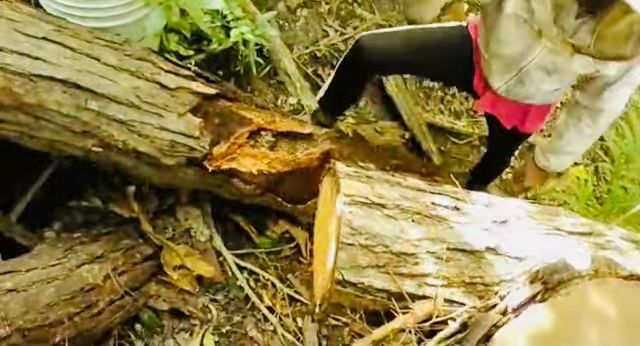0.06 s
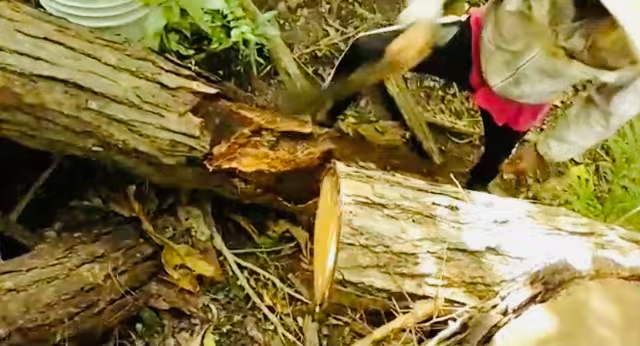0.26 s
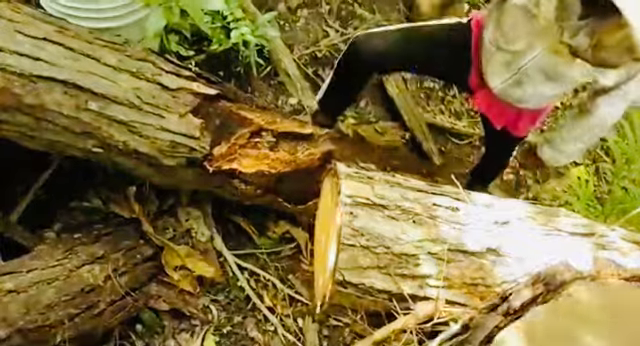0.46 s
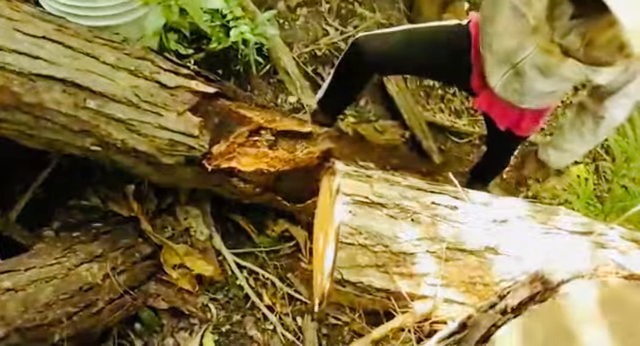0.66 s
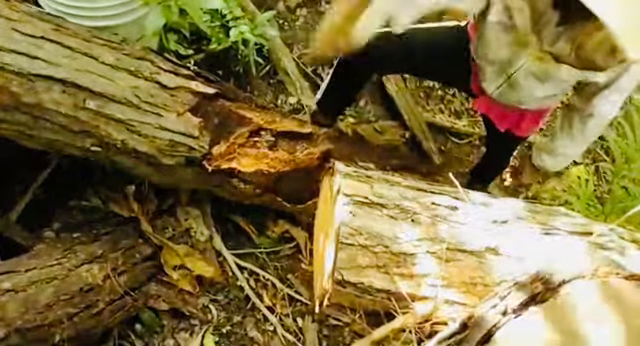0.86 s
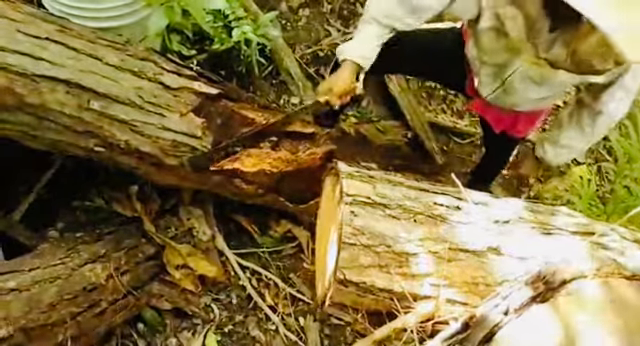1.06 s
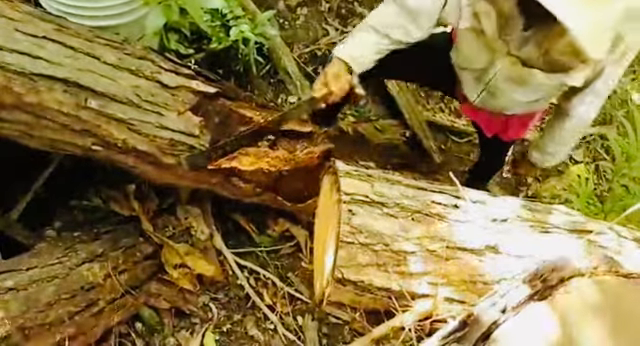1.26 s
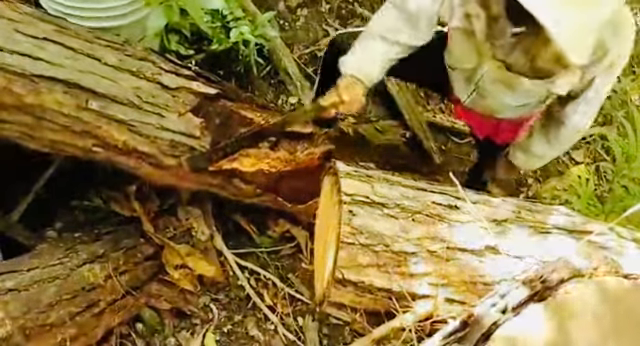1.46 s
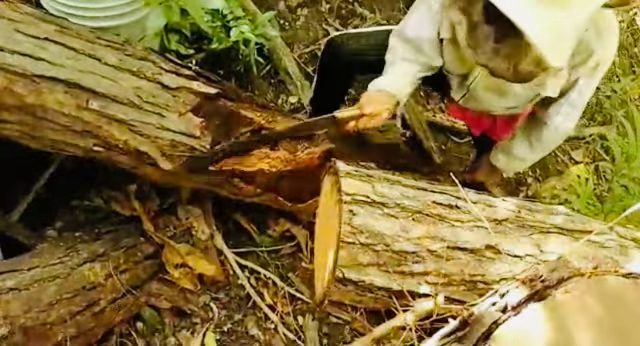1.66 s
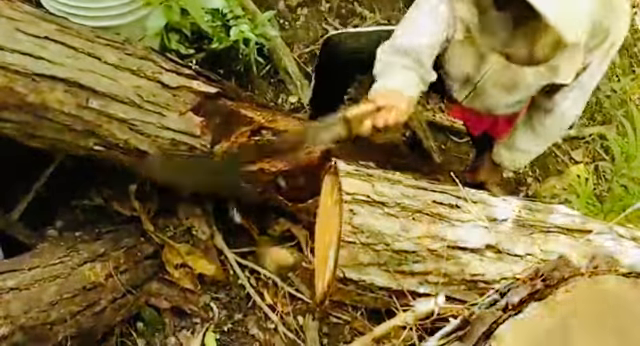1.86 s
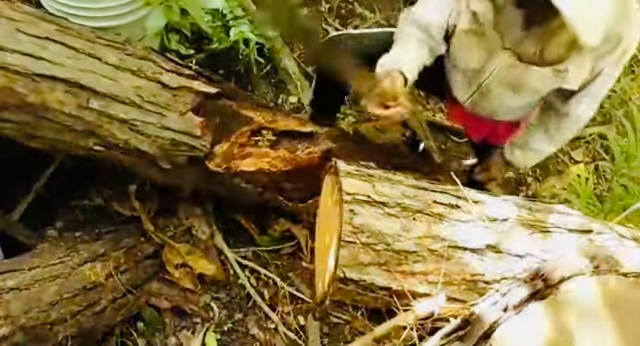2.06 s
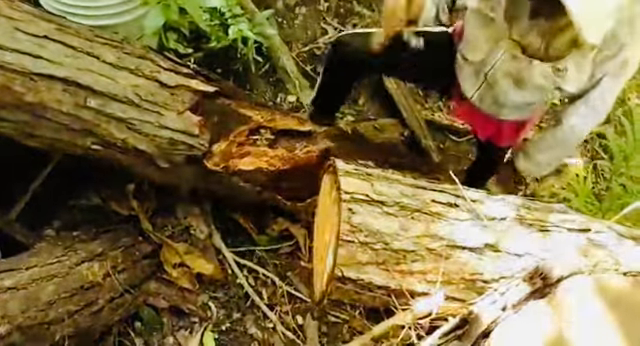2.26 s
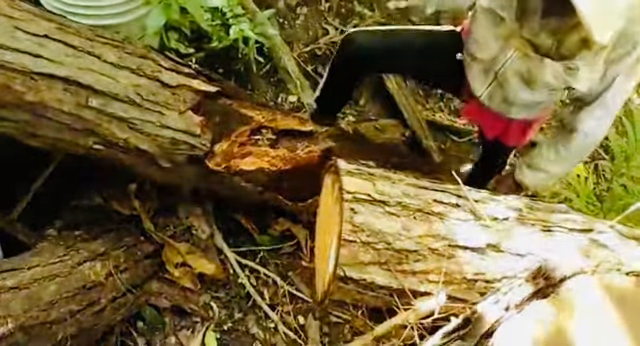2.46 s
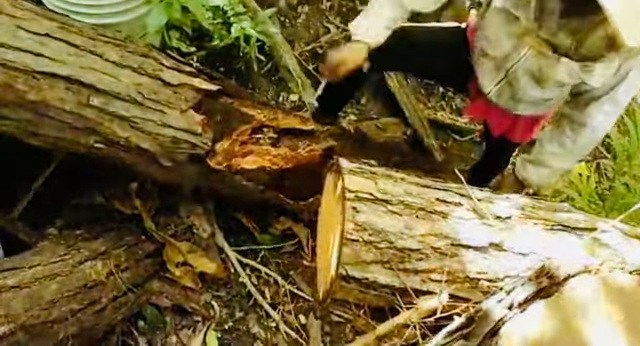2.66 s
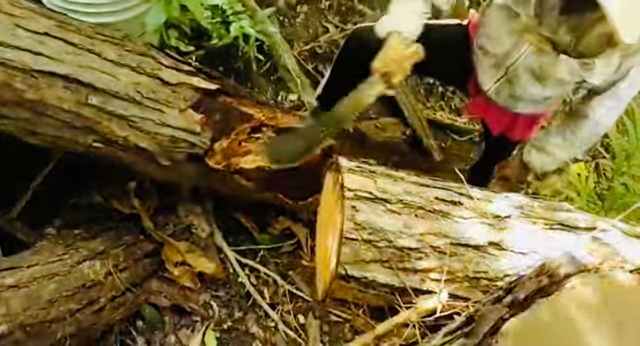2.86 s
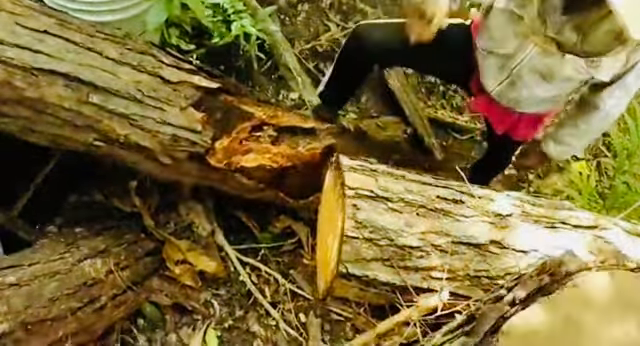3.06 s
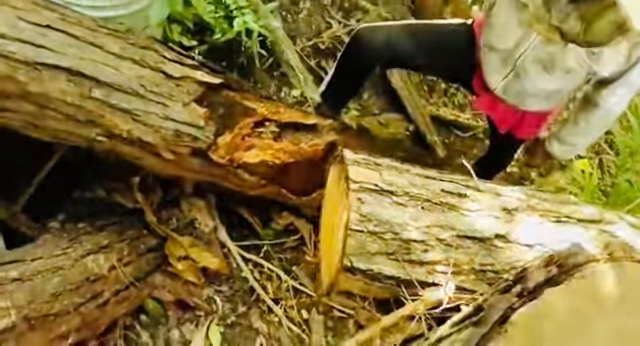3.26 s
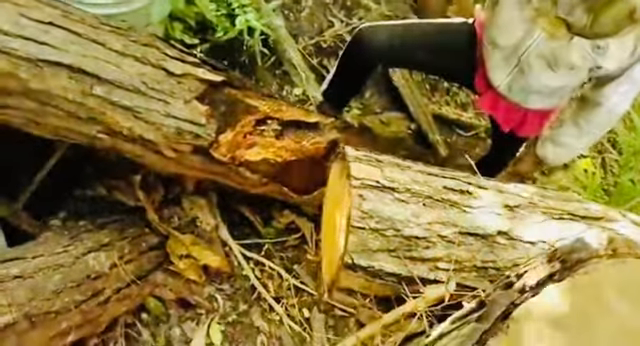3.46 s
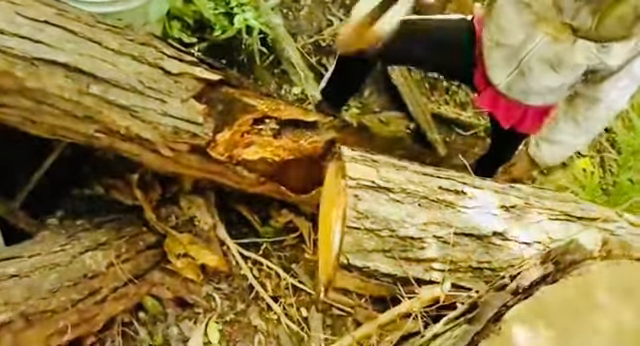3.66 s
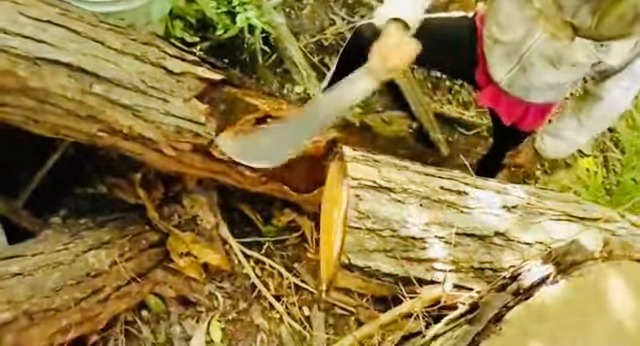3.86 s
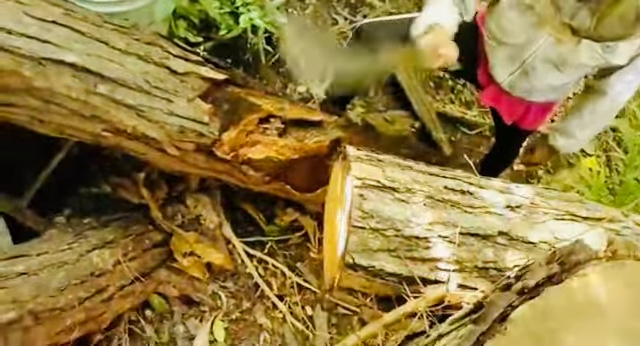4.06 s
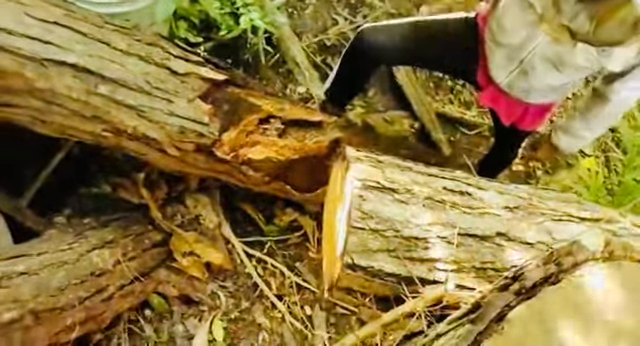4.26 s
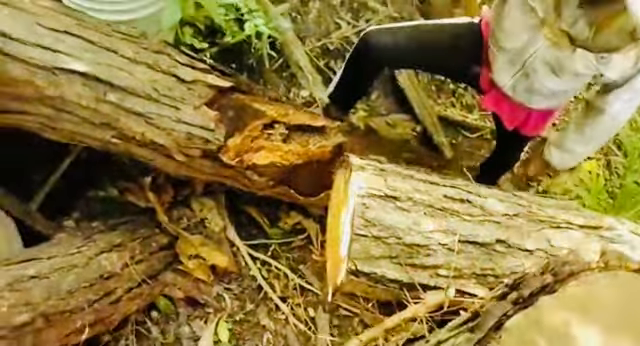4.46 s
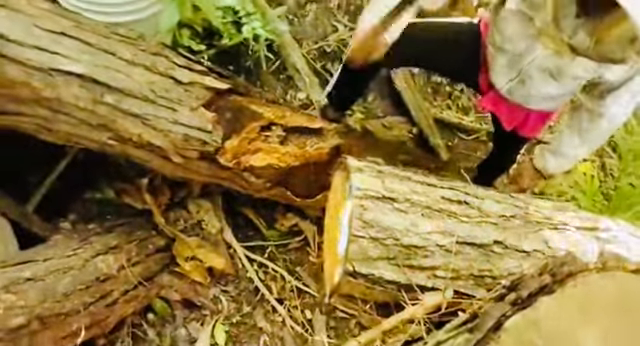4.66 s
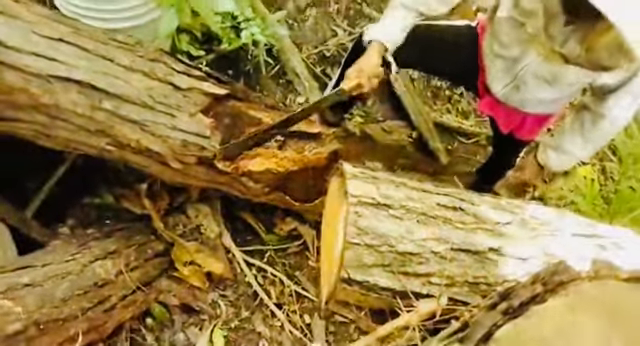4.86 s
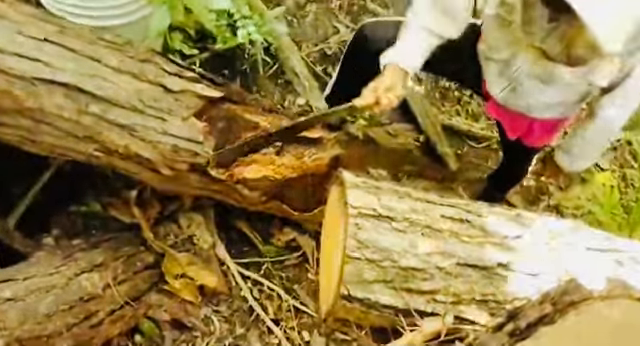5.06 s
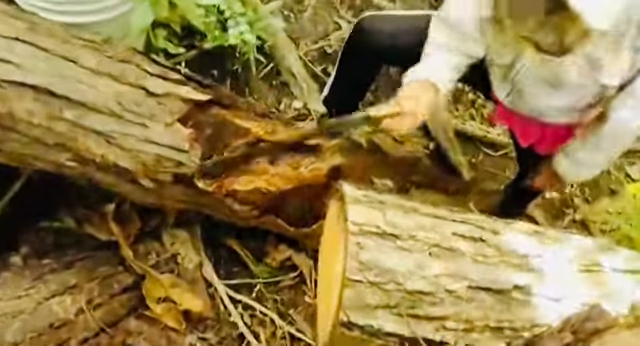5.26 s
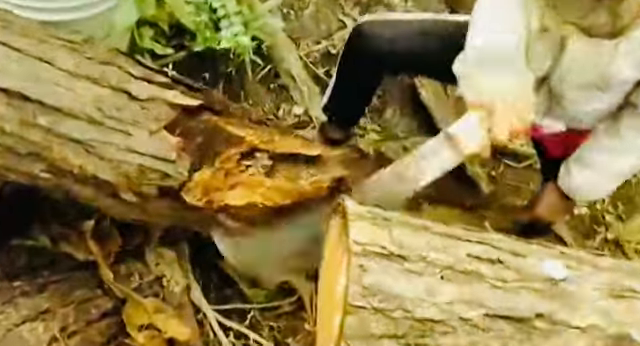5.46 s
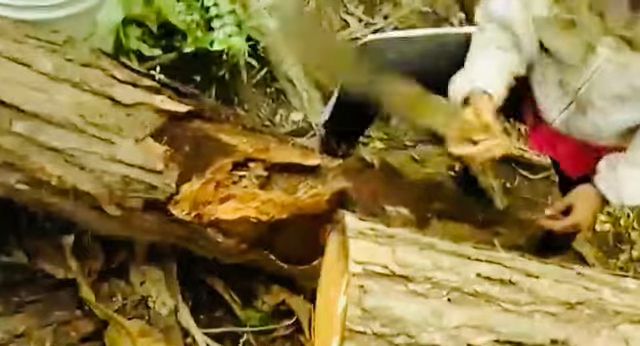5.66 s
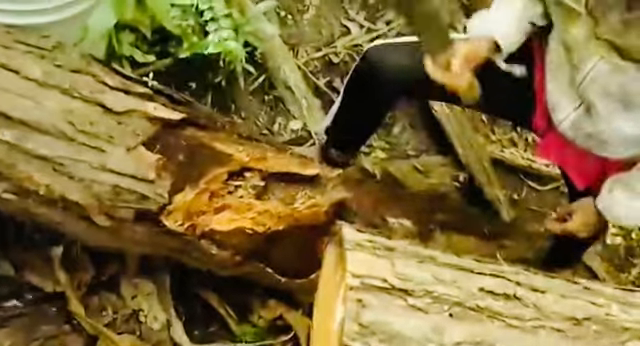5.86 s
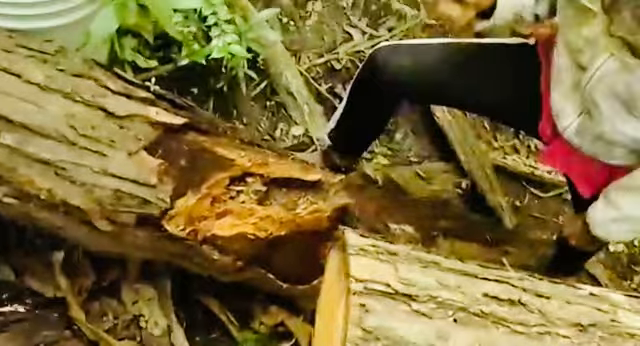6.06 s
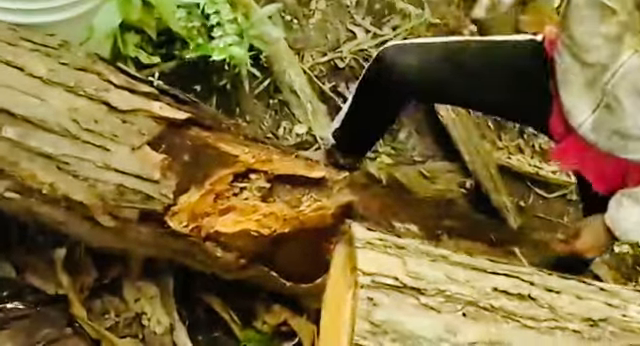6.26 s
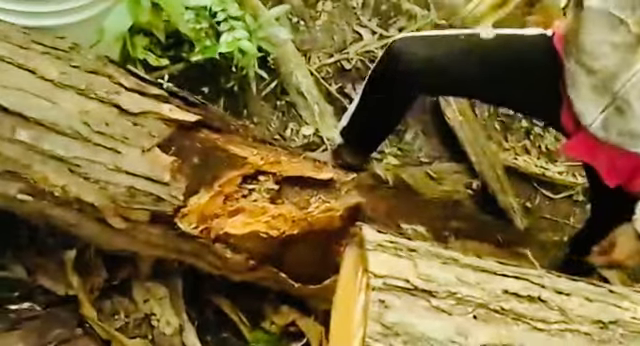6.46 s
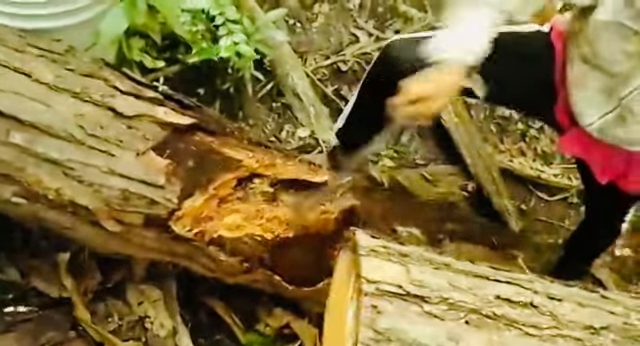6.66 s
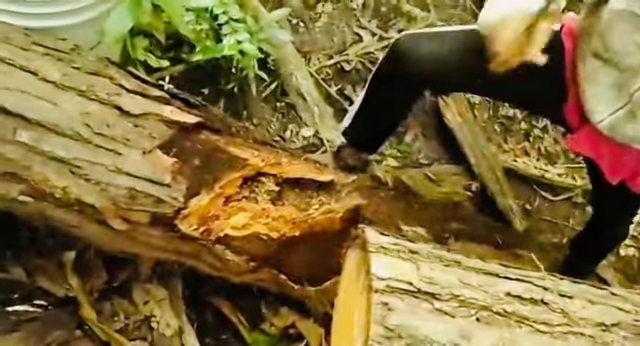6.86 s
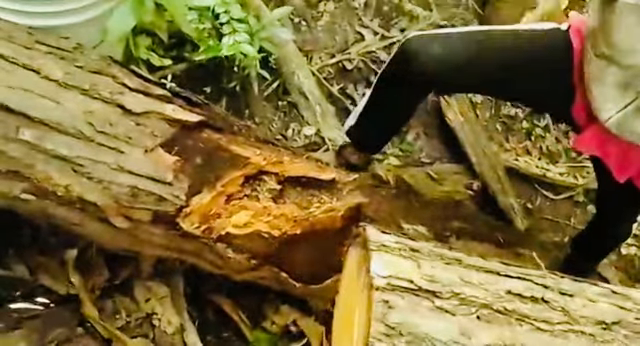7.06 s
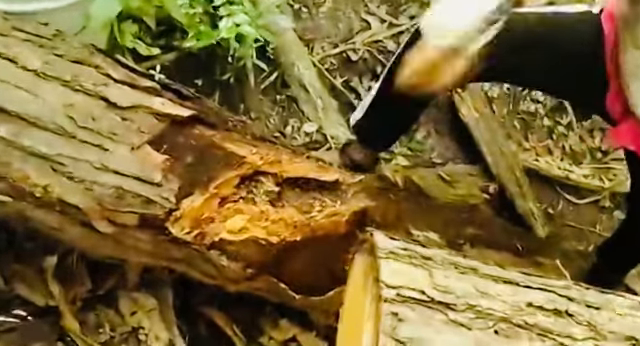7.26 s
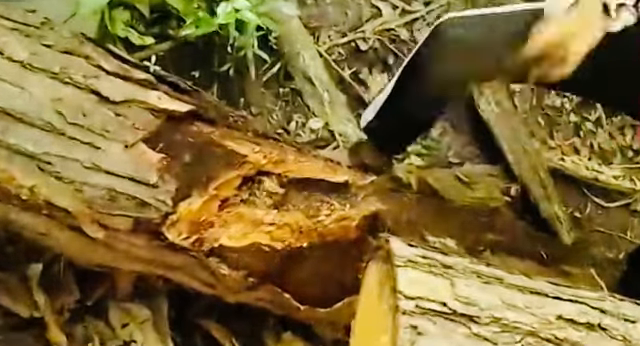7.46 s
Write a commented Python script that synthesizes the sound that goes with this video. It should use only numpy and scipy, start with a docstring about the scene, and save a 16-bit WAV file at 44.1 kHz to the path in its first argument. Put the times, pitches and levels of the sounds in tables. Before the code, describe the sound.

In a quiet wood, seven hard machete blows land unevenly on a hollow log, cracking and knocking with a short echo and a slight metallic ring. Twice the chopping pauses while the blade is worked free, tapping the log as fibres tear and snap; the first time a few chips drop. Very faint leaf rustle, two thin notes from a far bird and soft gusts on the microphone fill the background.

```python
"""A machete chops into a hollow log in a wood. The edge bites for some milliseconds, snapping fibres
while the hollow swells to a knock; the steel rings faintly and the trees around echo. Twice the blade
is levered out, tapping the log as fibres tear and snap; the first time it also creaks and chips fall.
Behind it are rustling leaves, light wind and a far bird. Two microphone ports (small openings), each
with its own treble resonance, hear it all."""
import sys
import numpy as np
from scipy import signal
from scipy.fft import rfft, irfft, next_fast_len
from scipy.io import wavfile
from scipy.ndimage import uniform_filter1d, map_coordinates

SR = 44100
rng = np.random.default_rng(int(sys.argv[2]) if len(sys.argv) > 2 else 0)


def digitize_waveform(pressure):
    """Quantize a signal to 16-bit integers and store it at the path in sys.argv[1].

    Rows of a 2-D input are taken as channels; values are limited to [-1, 1].
    """
    field = np.atleast_2d(pressure).T
    bounded = np.clip(field, -1, 1)
    quanta = np.round(bounded * 32767).astype(np.int16)
    wavfile.write(sys.argv[1], SR, quanta)


N = 330740
LEFT_LAG, LEAD = 6, 256  # in samples: delay at the left port, room left before each contact

# Machete blows: t/s, crack level/dB, crack brightness/(dB per octave), bite time/s, swell (0 at once,
# 2 late), knock level/dB, knock tilt/(dB per octave), ring level/dB, favoured ring/octaves above 1 kHz
CHOPS = [(0.0438, -17.5, -0.5, .010, 0.61, -16.5, -0.5, -43, 0),
         (.834, -18.5, -0.03, .013, 3.4, -22.5, 1, -39.5, -.6),
         (2.599, -23.5, .2, 0.01, 2.1, -21.5, 2.5, -27.5, -.8),
         (3.625, -18.5, 0.32, 0.011, .8, -22, 8.5, -58, .3),
         (4.624, -16, 1.2, 0.011, 1.65, -18.5, -0.6, -56, 0),
         (6.513, -19.5, -0.4, 0.008, 0.13, -16.5, -3, -28, 1.32),
         (7.2216, -17.5, 0.14, 0.0094, 0.68, -21, -2, -35, -.6)]
# Tone colour of breaking wood fibres: f/Hz, level/dB
FIBRES = [(60, -51), (150, -22), (300, 6), (800, 6.5), (2000, 2), (5000, -5), (10000, -10), (14000, -12.5),
          (15500, -22)]


def amp(db):
    """Turns decibels into a factor to multiply by."""
    return 10 ** (np.asarray(db) / 20)


def unit(x):
    """Scales x to an average power of 1."""
    return x / np.sqrt(np.mean(x ** 2) + 1e-20)


def along(rows, hz, column=1):
    """Reads a table between its rows, on a logarithmic frequency scale."""
    columns = np.transpose(rows)
    return np.interp(np.log(hz + 1), np.log(columns[0] + 1), columns[column])


def curve(rows):
    """Joins (time, level) points into one level in dB per sample; silent outside them."""
    times, levels = np.transpose(rows)
    return np.interp(np.arange(N) / SR, times, levels, -120, -120)


def wobble(rate):
    """A smooth random curve through `rate` points a second."""
    points = rng.standard_normal(int(N * rate / SR) + 4)
    return map_coordinates(points, [np.arange(N) * rate / SR])


def patches(hz, t, bands, frames):
    """Random hills and dips, each about `bands` steps of pitch by `frames` steps of time."""
    field = rng.standard_normal((len(hz), len(t)))
    return unit(uniform_filter1d(uniform_filter1d(field, bands, 0), frames, 1))


def filtered(x, response):
    """Multiplies each frequency in x by response(hz)."""
    size = next_fast_len(x.shape[-1] + 4096)
    hz = np.fft.rfftfreq(size, 1 / SR)
    return irfft(rfft(x, size) * response(hz), size)[..., :x.shape[-1]]


def diffuse(count, gain_db, size=256):
    """Noise from all around, shaped by gain_db(hz, t); left and right are alike only in the bass."""
    # How alike the two sides are: f/Hz, likeness (0 to 1)
    likeness = [(60, .6), (300, .68), (650, 0.41), (1300, 0), (15000, 0.0051)]
    hz, t, noise = signal.stft(rng.standard_normal((2, count)), SR, nperseg=size)
    angle = np.arccos(np.clip(along(likeness, hz), 0, 1))[:, None] / 2
    mid, side = noise[0] * np.cos(angle), noise[1] * np.sin(angle)
    shaped = amp(gain_db(hz[:, None], t)) * [mid + side, mid - side]
    return signal.istft(shaped, SR, nperseg=size)[1][:, :count]


def wind():
    """Gusts buffet the ports in lumps, with two single thumps, over a far steady rumble."""
    # Tone colour of the buffeting: f/Hz, level/dB
    buffet_colour = [(15, -13), (40, 0), (100, 0), (150, -17), (300, -13.5), (700, -42), (2000, -87.5)]
    # Strength of the wind on the ports: t/s, level/dB
    gusts = [(0, -79), (.23, -90.5), (1.8, -84), (2.53, -85), (2.82, -92.5), (3.74, -87.5), (4.3, -93),
             (4.78, -79.5), (5.2, -76), (5.33, -68), (5.65, -78.5), (6.35, -68), (7.05, -79.5),
             (7.35, -73.5), (7.5, -86)]
    # Tone colour of the far rumble: f/Hz, level/dB
    rumble_colour = [(15, -5.5), (45, -1), (100, -5), (140, -19.5), (300, -70)]
    # Gusts that thump the ports: t/s, level/dB
    puffs = [(5.966, -55.5), (6.091, -62)]
    buffet = diffuse(N, lambda hz, t: along(buffet_colour, hz), size=2048)
    lumps = amp(5.5 * np.array([wobble(14), wobble(14)]))
    mix = amp(curve(gusts)) * unit(buffet * lumps) * amp([[-2], [1.5]])  # stronger on the right
    mix += amp(-99) * unit(diffuse(N, lambda hz, t: along(rumble_colour, hz), size=2048))
    t = np.arange(round(.03 * SR)) / SR
    thump = np.sin(2 * np.pi * 280 * t) * t / .0028 * np.exp(1 - t / .0024)
    for at, db in puffs:
        mix[:, round(at * SR):][:, :len(t)] += amp(db) * thump
    return mix


def leaves():
    """Leaves rustle far away: a soft, slightly patchy hiss."""
    # Tone colour of the rustle: f/Hz, level/dB
    colour = [(140, -28.5), (200, -4), (300, 4), (500, 5), (1000, -1), (2500, -4), (5000, -10), (9000, -17),
              (12500, -23), (14200, -22.5), (14600, -62)]
    # Loudness of the rustle: t/s, level/dB
    loudness = [(0, -74), (1.2, -71.5), (2, -70.5), (3.4, -72), (4.4, -71.5), (5.6, -70.5), (6.4, -69.5),
                (7.5, -65.5)]
    level = amp(curve(loudness) + .48 * wobble(6))
    rustle = diffuse(N, lambda hz, t: along(colour, hz) + 1.1 * patches(hz, t, 5, 10), size=1024)
    return level * unit(rustle)


def bird():
    """A far bird sings two thin notes of steady pitch."""
    # Bird notes: t/s, length/s, f/Hz, level/dB
    notes = [(3.993, 0.0574, 4900, -80.5), (4.102, 0.036, 4870, -82.5)]
    t = np.arange(N) / SR
    return sum(amp(db) * np.sin(np.pi * np.clip((t - at) / length, 0, 1)) * np.sin(2 * np.pi * hz * t)
               for at, length, hz, db in notes)


def tree_echo(colour):
    """Near trunks echo in uneven patches; the far wood adds a slower, fainter tail."""
    # Echo of the wood: f/Hz, level/dB, base time to fade by 60 dB/s
    echo_bands = [(100, -16, 0.15), (298, 1.5, 0.44), (603, 3.5, 0.23), (925, -7, 0.45), (3239, 3, 0.34),
                  (7000, 2, .36), (12000, 1, 0.29), (14000, -5, 0.22), (14800, -38.5, 0.19)]

    def fading_db(hz, t):
        fade_time = along(echo_bands, hz, column=2)
        near = amp(-60 * t / (.77 * fade_time))
        far = amp(-14 - 60 * t / (2 * fade_time))
        uneven_db = 3.4 * patches(hz, t, 2, 12)
        return colour(hz) + along(echo_bands, hz) + 20 * np.log10(near + far) + uneven_db

    tail = diffuse(SR // 2, fading_db)
    t = np.arange(SR // 2) / SR
    fade_in_out = (1 - np.exp(-t / .003)) * np.cos(np.pi * t)
    return tail / np.std(tail[:, :SR // 20]) * fade_in_out


def place(mix, at, cracks, tones, echo_db, colour):
    """Adds a crack and its tones to the mix, later and weaker on the left, then the trees' echo."""
    start = round(at * SR)
    direct = np.pad(tones, (LEAD, 0)) * amp([[-2.2], [0]])
    direct[:, :cracks.shape[1]] += cracks * amp([[-1], [0]])
    mix[0, start - LEAD + LEFT_LAG:][:direct.shape[1]] += direct[0]
    mix[1, start - LEAD:][:direct.shape[1]] += direct[1]
    mix[:, start:][:, :SR // 2] += amp(echo_db) * tree_echo(colour)


def fibre_colour(centre_hz, spread):
    """The fibres' tone colour gathered round one pitch: cut by 6 dB at `spread` octaves away."""
    def colour(hz):
        octaves = np.log2((hz + 1) / centre_hz)
        return along(FIBRES, hz) + np.maximum(-6 * (octaves / spread) ** 2, -60)
    return colour


def crack(length, colour, abruptness):
    """Fibres snap in uneven grains of noise, strongest at the first touch."""
    t = np.arange(3600) / SR
    shared, *own = rng.standard_normal((3, len(t)))
    noise = shared + .96 * np.array(own)  # the long edge reaches each port a little differently
    grains = noise * amp(3 * np.repeat(rng.standard_normal(len(t) // 30), 30))
    fade = (1 - np.exp(-t / (.0001 + .067 * length))) * np.exp(-(t / length) ** abruptness)
    burst = filtered(np.pad(grains * fade, ((0, 0), (LEAD, 0))), lambda hz: amp(colour(hz)))
    return burst * np.linalg.norm(fade) / np.linalg.norm(burst) * np.sqrt(2)


def chips():
    """Each falling chip or crumb lands with a gritty tock of a few cycles at its own pitch."""
    # Chips landing: t/s, level/dB, f/Hz
    landings = [(1.772, -38, 1150), (1.817, -55, 1005), (1.951, -55, 890), (1.984, -59.5, 10700),
                (2.103, -52.5, 1450)]
    # Shower of fine crumbs: start/s, end/s, middle level/dB, middle f/Hz
    shower = (1.78, 2.2, -69, 9500)
    start, end, crumb_db, crumb_hz = shower
    crumbs = [(start + (end - start) * when, crumb_db + 8 * (loud - .5),
               crumb_hz * 2 ** (.8 * (high - .5))) for when, loud, high in rng.random((22, 3))]
    mix, t = np.zeros((2, N + SR)), np.arange(SR // 10) / SR
    for at, db, hz in landings + crumbs:
        tock = amp(db) * np.sin(2 * np.pi * hz * t) * np.exp(-hz * t / 2.14)
        colour = fibre_colour(hz, spread=.94)
        grit = amp(db) * crack(.00092 + 2 / hz, colour, abruptness=.76)
        place(mix, at, grit, tock, db - 26, colour)
    return mix[:, :N]


def tearing():
    """Fibres part in a clumped, bright crackle while the blade is levered out."""
    # Fibres tearing round the blade, one list for each pull: t/s, level/dB
    pulls = [
        [(1.36, -88), (1.4, -74.5), (1.446, -67.5), (1.576, -57), (1.76, -83)],
        [(5.06, -95), (5.146, -67.5), (5.268, -79), (5.44, -88)],
    ]
    level = sum(amp(curve(pull)) for pull in pulls)
    hiss = diffuse(N, lambda hz, t: along(FIBRES, hz) + 2.2 * np.log2(hz / 8000 + .012))
    clumps = amp(4.4 * wobble(200))
    return level * unit(hiss * clumps)


def creak():
    """The stuck blade sticks and slips by turns: thin clicks that slow down."""
    # The slipping blade: t/s, level/dB, f/Hz, bandwidth/Hz
    slipping = (1.386, -56, 5300, 1600)
    at, db, hz, width_hz = slipping
    count, first_gap_s, gap_growth = 19, .0021, 1.05
    gap_scatter, level_scatter = rng.standard_normal((count, 2)).T
    gaps = first_gap_s * gap_growth ** np.arange(count) * (1 + .05 * gap_scatter)
    times = at + np.cumsum(gaps)
    slips, t = np.zeros(N), np.arange(SR // 100) / SR
    slips[(times * SR).astype(int)] = amp(db + 1.5 * level_scatter)
    click = np.sin(2 * np.pi * hz * t) * np.exp(-np.pi * width_hz * t)
    clicks = np.convolve(slips, click)[:N]
    return np.array([np.roll(clicks, LEFT_LAG), clicks])


def snaps():
    """Fibres break under the levering blade: bright dry cracks with no ring."""
    # Breaking fibres: t/s, level/dB, length/s, spread/octaves
    breaks = [(1.484, -57, 0.0016, 1), (1.505, -55, .003, 0.54), (1.518, -35, 0.00073, .45),
              (1.526, -27.5, .0007, 1.34), (1.537, -36.5, 0.0025, 0.29), (1.563, -46, 0.016, .5),
              (1.575, -38.5, 0.015, 0.4), (1.588, -31.5, 0.0038, 2.03), (5.12, -63, .003, 0.23),
              (5.177, -40, 0.0013, 1.3)]
    mix, no_tones = np.zeros((2, N + SR)), np.zeros(SR // 10)
    for at, db, length, spread in breaks:
        colour = fibre_colour(10450, spread)
        snap = amp(db) * crack(length, colour, abruptness=.84)
        echo_db = db + 10 * np.log10(length) - 1  # longer cracks echo more
        place(mix, at, snap, no_tones, echo_db, colour)
    return mix[:, :N]


def steel_ring(t, db, favoured, rise_s):
    """Fading steel tones; where the blade is struck favours one pitch, and its quiver makes them waver."""
    # Tones of the bending blade: f/Hz, level/dB, time to fade by 60 dB/s
    blade_tones = [(955, 2, .2), (1612, 2, .19), (2324, 2, .18), (4090, 7, .18), (7560, -8, .4)]
    tones = np.zeros(len(t))
    for hz, tone_db, fade_time in blade_tones:
        waver_db = np.interp(60 * t, range(24), 2.2 * rng.standard_normal(24))
        octaves_away = np.log2(hz / 1000) - favoured
        level_db = db + tone_db - 8 * octaves_away ** 2 + waver_db - 60 * t / fade_time
        tones += amp(level_db) * np.sin(2 * np.pi * hz * t)
    return tones * (1 - np.exp(-t / rise_s))


def log_knock(t, bite, swell, db, tilt_db):
    """The hollow swells as the blade drives in (slowly if it sinks deep), then drops and rings out."""
    # Tones of the hollow log: f/Hz, level/dB, time to fade by 60 dB/s
    log_tones = [(305.6, -6, .057), (485.4, 1.8, .074), (634.8, -3, .047), (1083, -12.5, 0.071)]
    after_bite = np.maximum(t - bite, 0)
    rise = np.minimum(t / bite, 1) ** swell
    drop = .38 + .62 * np.exp(-after_bite / .002)
    detunes = 1 + .012 * rng.standard_normal(len(log_tones))
    phases = rng.random(len(log_tones))
    tones = np.zeros(len(t))
    for (hz, tone_db, fade_time), detune, phase in zip(log_tones, detunes, phases):
        level_db = db + tone_db + tilt_db * np.log2(hz / 500) - 60 * after_bite / fade_time
        tones += amp(level_db) * np.sin(2 * np.pi * (hz * detune * t + phase))
    return rise * drop * tones


def taps():
    """The blade bumps the log lightly: a broad short crack, a knock and some ringing steel."""
    # Light touches: t/s, crack level/dB, crack length/s, knock level/dB, ring level/dB,
    # favoured ring/octaves above 1 kHz
    touches = [(1.596, -43.5, 0.013, -49, -56.5, 0.98), (5.102, -53.5, .0036, -65, -90, 1),
               (5.179, -44.5, 0.016, -49.5, -47.5, 2.38), (5.292, -45, 0.0075, -42.5, -57, 0.65),
               (5.373, -58, 0.0049, -80, -65, 3.7)]
    mix, t = np.zeros((2, N + SR)), np.arange(round(.3 * SR)) / SR
    colour = fibre_colour(5600, spread=2.58)
    for at, db, length, knock_db, ring_db, favoured in touches:
        knock = log_knock(t, bite=.0062, swell=.38, db=knock_db, tilt_db=1)
        ring = steel_ring(t, ring_db, favoured, rise_s=.001)
        tick = amp(db) * crack(length, colour, abruptness=.9)
        echo_db = db + 10 * np.log10(length) - 1
        place(mix, at, tick, knock + ring, echo_db, colour)
    return mix[:, :N]


def thuds():
    """The log jolts the ground: one soft low push for each chop."""
    pushes, t, thud_hz = np.zeros(N), np.arange(N) / SR, 59.94
    for at, db, *_ in CHOPS:
        cycles = thud_hz * np.maximum(t - at, 0)
        pushes += amp(db - 44) * np.sin(2 * np.pi * cycles) * cycles * np.exp(1 - cycles / .35)
    return pushes * amp([[-1.5], [1.5]])


def chops():
    """With each machete blow the edge cracks fibres, the hollow log knocks and the steel rings."""
    mix, t = np.zeros((2, N + SR)), np.arange(round(.3 * SR)) / SR
    for at, db, bright_db, bite, swell, knock_db, tilt_db, ring_db, favoured in CHOPS:
        colour = lambda hz: along(FIBRES, hz) + bright_db * np.log2(hz / 3000 + .057)
        knock = log_knock(t, bite, swell, knock_db, tilt_db)
        ring = steel_ring(t, ring_db, favoured, rise_s=.006)
        cut = amp(db) * crack(.85 * bite, colour, abruptness=1.8)
        place(mix, at, cut, knock + ring, db - 14.5, colour)
    return mix[:, :N]


def scene():
    """Adds up all the sounds; a low-cut thins the deep bass of the hits."""
    bass_cut = lambda hz: 1j * hz / 150 / (1 + 1j * hz / 150)
    hits = filtered(chops() + taps() + snaps() + chips(), bass_cut)
    return hits + thuds() + creak() + tearing() + leaves() + wind() + bird()


def record(dry):
    """Each port is a small cavity with one resonance; peaks are rounded off and the top treble is cut."""
    # Left and right port: resonance f/Hz, bandwidth/Hz, share that passes above the resonance
    ports = [(7687, 830, 0.47), (11000, 1000, 0.043)]

    def resonances(hz):
        return np.array([(centre ** 2 + leak * hz ** 2) / (centre ** 2 - hz ** 2 + 1j * hz * width)
                         for centre, width, leak in ports])

    ceiling, top_hz = .55, 15332
    heard = filtered(dry, resonances)
    rounded = heard / (1 + np.abs(heard / ceiling) ** 4) ** (1 / 4)
    return filtered(rounded, lambda hz: np.clip((top_hz - hz) / 1200, 0, 1) ** 2)


dry = scene()
out = record(dry)
digitize_waveform(out)
```